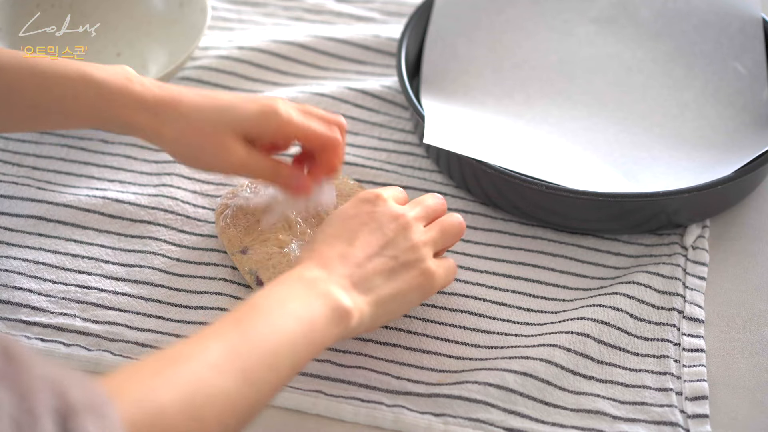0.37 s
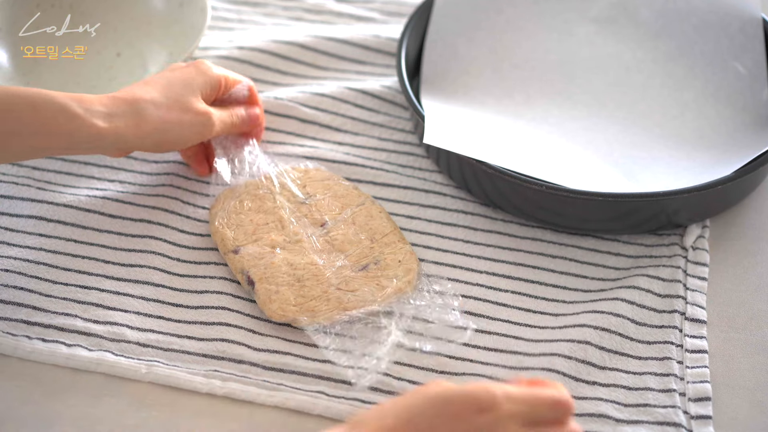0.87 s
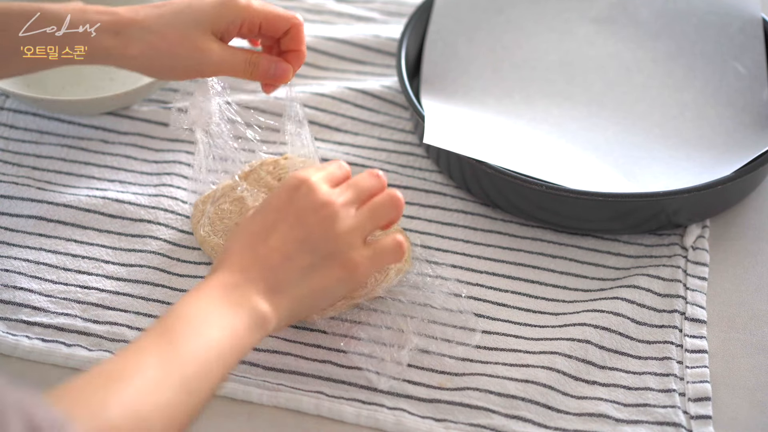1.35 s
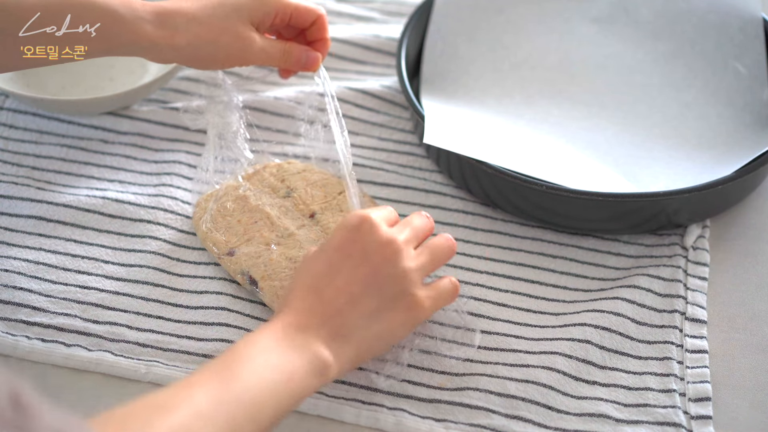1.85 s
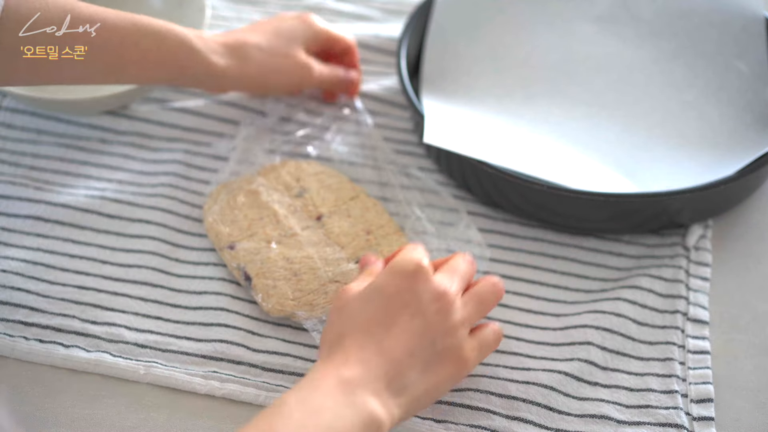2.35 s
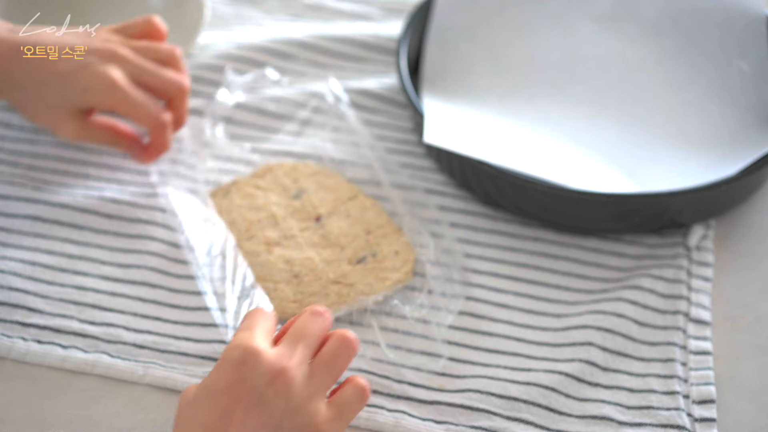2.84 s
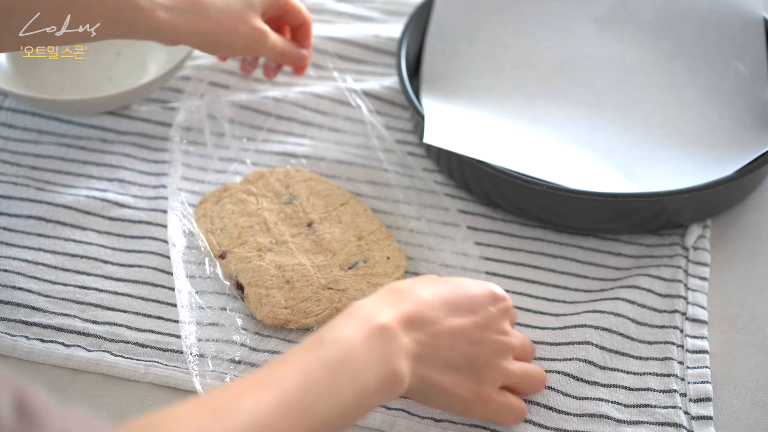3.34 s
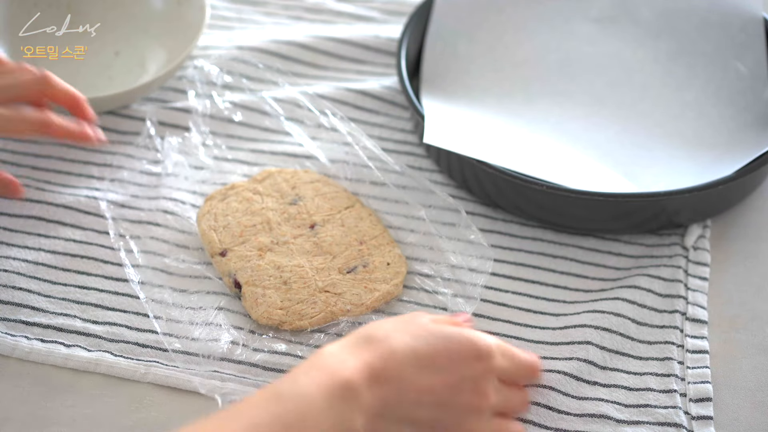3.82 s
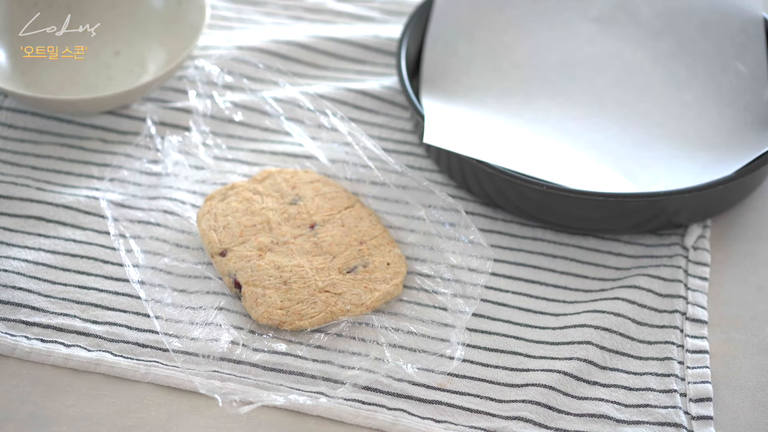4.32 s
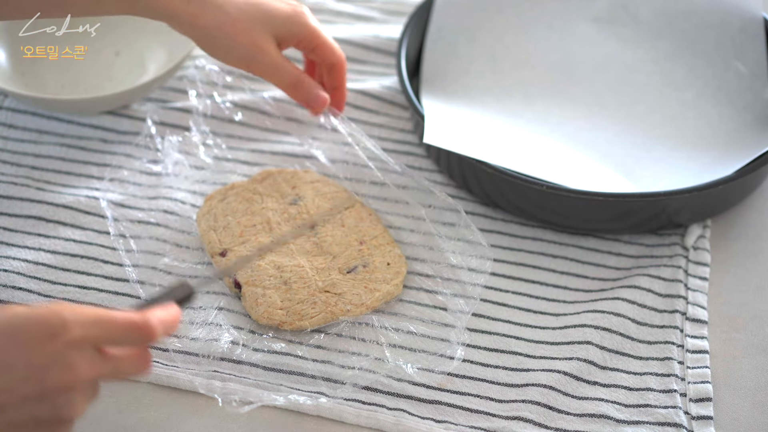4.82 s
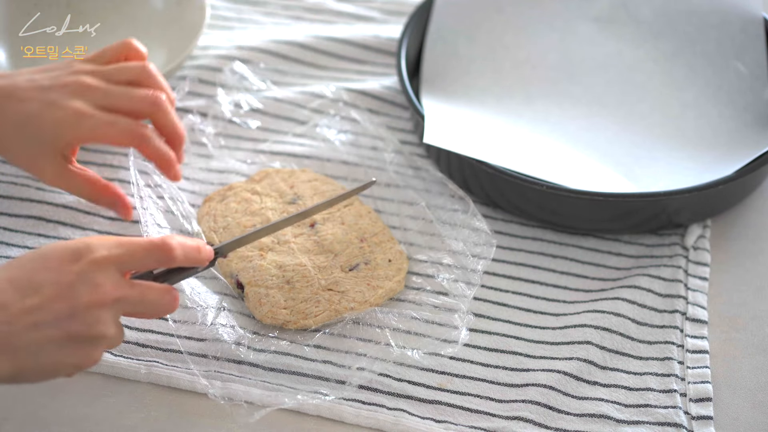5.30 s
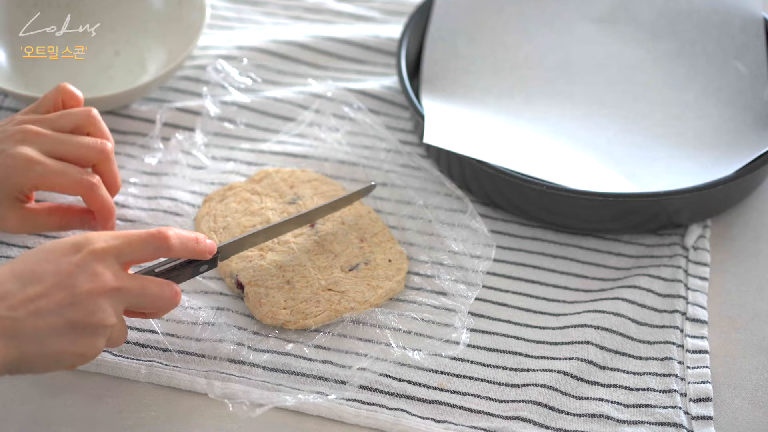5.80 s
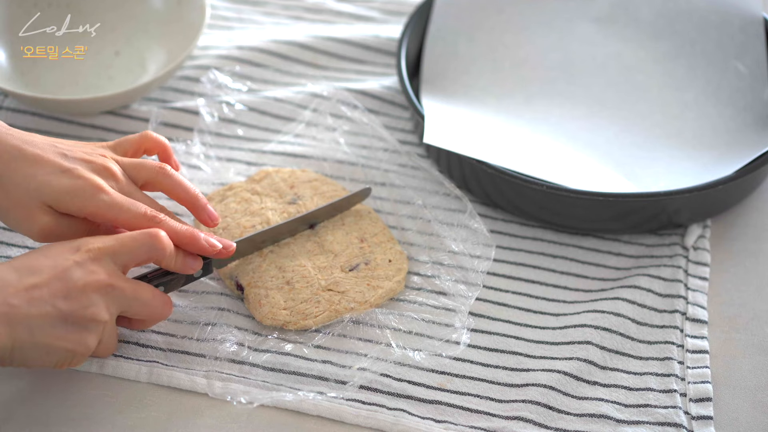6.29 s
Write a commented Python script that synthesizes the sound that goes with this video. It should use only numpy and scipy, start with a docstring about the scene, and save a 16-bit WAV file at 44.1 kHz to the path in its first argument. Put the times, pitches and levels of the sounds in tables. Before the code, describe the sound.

Thin plastic film crackles and snaps in bursts as hands peel it off dough, then a knife clinks and lighter crinkles follow in a quiet kitchen.

```python
"""Cling film crackles as hands peel it off a slab of dough: thousands of tiny random folds snap in bursts.
Creases snap at their own pitch, air pockets pop as noise pushes on resonances, and the towel rustles.
A bowl rings in pure tones and a knife clinks; a fridge hums over low rumble, air hiss and a faint whine.
It opens on the last moment of an oven fan, made of filtered noise; the fan fades out, then the kitchen fades in."""
import sys
import numpy as np
from scipy import signal
from scipy.fft import rfft, irfft
from scipy.io import wavfile
from scipy.ndimage import uniform_filter1d

SR = 44100
rng = np.random.default_rng(int(sys.argv[2]) if len(sys.argv) > 2 else 0)


def to_wav(s):
    """Save 16-bit WAV."""
    ch = np.atleast_2d(s).T  # columns
    pcm = np.round(np.clip(ch, -1, 1) * 32767)  # PCM
    wavfile.write(sys.argv[1], SR, pcm.astype(np.int16))


def to_linear_factor(level_db):
    """Convert decibel levels (scalar or array-like) to linear amplitude factors."""
    exponent = np.asarray(level_db, float) / 20
    return 10 ** exponent


N = 293706
T = np.arange(N) / SR  # time of each sample in seconds

# Kitchen levels below are set ahead of the room echo and of the final fade-in.
# Tone of the rumble. Each row: frequency in Hz, relative level in dB.
RUMBLE_TONE = [(15, -87.5), (25, -34.5), (124, -16), (198, -8.5), (237, -1), (372, -11), (509, -6),
               (823, -16.5), (900, -17.5), (1170, -48.5), (1980, -120)]
# Tone of the air hiss. Each row: frequency in Hz, relative level in dB.
AIR_TONE = [(240, -32), (400, -14.5), (740, -8.5), (775, -7), (890, -7.5), (976, -6.5), (1500, -7.5),
            (1950, -13), (2570, -19), (3000, -25.5), (9660, -40.5), (12000, -43.5), (15800, -48)]
# The fridge hum swells and sinks. Each row: time in seconds, level in dB.
HUM_LEVEL = [(.13, -47.5), (.5, -49.5), (1.0, -55), (1.3, -46.5), (1.82, -55.5), (2.69, -62.5), (3.6, -54),
             (4.37, -61.5), (4.9, -58.5), (5.7, -66.5), (6.66, -67)]
# Tone of the oven fan. Each row: frequency in Hz, relative level in dB.
OVEN_TONE = [(35, -56), (60, -35.5), (100, -3), (168, -22), (233, 5.5), (398, -8.5), (621, -2.5),
             (1310, -20), (1950, -3), (2410, -17.5), (2710, -15), (12400, -37), (16000, -53)]
# The last moment of the oven fan. Each row: time in seconds, level in dB.
OVEN_LEVEL = [(0, -49), (.01, -40), (.05, -48), (.075, -52.5), (.088, -62), (.092, -100)]
# The kitchen fades in and then holds its last gain. Each row: time in seconds, gain in dB.
KITCHEN_GAIN = [(.092, -48), (.1, -42), (.125, -12), (.16, -8), (.25, -3)]
# Tone of the rustling cloth. Each row: frequency in Hz, relative level in dB.
CLOTH_TONE = [(280, -1), (400, -4), (550, 0.5), (800, -4), (1000, -12)]
# Hands shift dough and towel. Each row: time of the height in seconds, level in dB, swell and fade in seconds.
TOWEL_PATS = [(.2, -60, 0.12), (.55, -48.5, 0.83), (.83, -59, 0.18), (.95, -62, 0.05), (1.2, -50.5, 0.62),
              (1.32, -48.5, .08), (1.43, -48.5, .06), (1.62, -50, 0.21), (1.97, -48, 0.16),
              (2.22, -51.5, 0.027), (2.42, -54, 0.37), (2.69, -47.5, .03), (2.92, -56.5, .1),
              (3.1, -60.5, 0.18)]
# Resonances of the bowl. Each row: frequency in Hz, width in Hz, level in dB.
BOWL_MODES = [(1615, 26, -72), (2729, 22, -59), (4080, 12, -50.5), (5660, 14, -67.5), (7472, 30, -89),
              (10196, 25, -74), (14023, 17.5, -70)]
# Resonances of the knife blade. Each row: frequency in Hz, width in Hz, gain in dB.
BLADE_MODES = [(3100, 44, 7.5), (3300, 150, 0), (4030, 69, 9.5), (4600, 110, -2), (5500, 200, -1),
               (5800, 150, -2), (7130, 150, 6.5), (7300, 49, 2), (7650, 150, -8), (8240, 95, 4),
               (8800, 90, -4), (9300, 120, -3), (10800, 120, -13), (11800, 110, 5), (12400, 140, -6),
               (14200, 130, 5), (15300, 120, -4), (15700, 90, -10)]
# Knocks on the blade. Each row: start in seconds, strength in dB, time to the fullest push in seconds.
BLADE_KNOCKS = [(4.305, -45, 0.0074), (4.328, -37, 0.0084), (4.336, -45, 0.003), (4.352, -39, 0.0072),
                (4.372, -49, .016)]
# Resonances of the knife handle. Each row: frequency in Hz, width in Hz, gain in dB.
HANDLE_MODES = [(690, 84, 0.5), (980, 140, -4), (1920, 120, 7.5), (2420, 390, -4.5), (2570, 210, 0),
                (3400, 490, -6), (4350, 760, -9.5), (6200, 710, -13), (8500, 710, -24), (9600, 470, -19),
                (12700, 1000, -34)]
# Knocks on the handle. Each row: start in seconds, strength in dB, time to the fullest push in seconds.
HANDLE_KNOCKS = [(4.574, -42, .003), (4.579, -31, .006), (4.6, -36, .007), (4.62, -42, .012)]
# Resonances of the air pockets. Each row: frequency in Hz, width in Hz, gain in dB.
POCKET_MODES = [(690, 130, -22), (2090, 200, 7), (2470, 320, 3.5)]
# Pops of the pockets. Each row: start in seconds, strength in dB, time to the fullest push in seconds.
POCKET_POPS = [(1.945, -36, .008), (2.817, -33, .005), (3.007, -38, .005)]
# The hollow under the sheet as it lifts off the dough. Each row: frequency in Hz, width in Hz, gain in dB.
HOLLOW_MODES = [(1120, 116, -3), (1282, 70, 6), (1570, 90, 1), (1700, 90, -2.5)]
# Pushes on that hollow. Each row: start in seconds, strength in dB, time to the fullest push in seconds.
HOLLOW_PUSHES = [(.82, -33.5, .009), (0.839, -33, .007)]
# Lone snaps of a crease. Each row: start in seconds, level in dB, pitch in Hz, left minus right in dB.
CREASE_SNAPS = [(0.2104, -61, 2330, 4), (0.2307, -55, 2140, 7), (0.3656, -47, 13700, -6),
                (0.6765, -45, 12100, 9), (0.7704, -39, 13600, 2), (0.7934, -32, 13380, 1.5),
                (0.8044, -27, 11800, -1.5), (0.8224, -28, 2890, -7.5), (0.8446, -24.5, 1740, 4),
                (0.961, -43, 13400, 6.5), (0.9895, -42, 13700, 4), (1.011, -52, 2410, 5),
                (1.0894, -34.5, 3100, 1), (1.125, -37, 14200, 0.5), (1.149, -33, 2280, -2),
                (1.1645, -32, 12800, -1), (1.2514, -26, 3850, 3.5), (1.3089, -32, 3880, 7),
                (1.463, -47, 12600, 6), (1.511, -41, 13900, -1.5), (1.5852, -27, 11400, -2.5),
                (1.5955, -28, 7810, 4), (1.6174, -30, 14200, -3.5), (1.6354, -30, 3960, 2.5),
                (1.852, -49, 7300, 3.5), (2.158, -30.5, 2730, -2), (2.225, -32, 12400, -1),
                (2.265, -32.5, 2680, -4), (2.3113, -31, 2930, 0.5), (2.4275, -42.5, 9800, -4),
                (2.4631, -45, 3300, 3), (2.496, -42.5, 3180, 3), (2.589, -33, 2820, -3),
                (2.7324, -33, 13300, 9), (2.8964, -38, 2480, 0), (3.246, -41, 12000, -1),
                (3.2908, -46, 12800, 1.5), (4.9588, -35, 3370, 3), (5.0642, -36, 3100, 1),
                (5.5455, -43.5, 2880, -5), (5.58, -35.5, 3270, 0), (5.783, -48.5, 3100, 9.5),
                (6.5108, -60, 13400, 1.5), (6.533, -53, 13600, 8), (6.578, -47, 3520, 4),
                (6.619, -54, 2000, 6)]
# Tones of the folds, from the smallest to the whole flexing sheet.
# Each row: frequency in Hz, relative level in dB.
FINEST_TONE = [(9000, -17.5), (11500, -8), (14000, -4.5), (15800, -8.5)]
FINE_TONE = [(4000, 1), (5500, -1.5), (7500, 0.5), (9500, 2), (11000, -9)]
PUCKER_TONE = [(2600, -16.5), (3150, -0.5), (3800, 0), (4300, -2), (4900, -19)]
WIDE_TONE = [(1700, -14.5), (2300, -1), (3000, 1.5), (4000, -1.5), (5000, -7)]
FLEX_TONE = [(600, -8), (1000, -10.5), (1280, -5.5), (1700, -2), (2300, -2), (3000, -15.5)]
# Each tug on the film. Each row: time of its height in seconds, strength in dB, swell in seconds,
# fade in seconds, breadth of the folds in dB.
FILM_TUGS = [(.17, -86, 0.058, .1, 17), (.25, -69.5, .04, 0.16, 1), (0.387, -41, 0.093, 0.17, -10.5),
             (.46, -43, 0.16, 0.21, -4), (.6, -49, 0.2, 0.091, -22), (.69, -48, 0.044, .06, -16),
             (0.776, -41, 0.15, 0.18, -11), (0.834, -37, 0.062, 0.043, 2), (.89, -48.5, 0.079, 0.11, -1.5),
             (.99, -66.5, 0.035, .04, -14), (1.046, -48, 0.033, 0.087, 2), (1.142, -47, 0.13, 0.22, -7),
             (1.195, -44, 0.048, 0.069, -0.5), (1.262, -47, 0.45, 0.18, -1), (1.376, -47, 0.2, 0.1, -4),
             (1.506, -36.5, 0.01, 0.076, -31), (1.632, -37, 0.14, 0.11, -7.5),
             (1.71, -51.5, 0.044, 0.037, -2), (1.872, -59.5, 0.048, 0.12, -4.5), (1.92, -68, .03, .03, -10),
             (1.961, -41, 0.031, 0.16, -3), (2.13, -54, 0.045, 0.044, -10), (2.06, -46, 0.074, 0.084, -4),
             (2.214, -43, 0.16, 0.19, 1), (2.36, -53, 0.15, 0.075, -1.5), (2.428, -62, 0.023, 0.018, -3),
             (2.465, -66, 0.055, 0.041, 10), (2.496, -60, 0.022, 0.043, 5.5), (2.567, -51, 0.021, 0.077, 1),
             (2.6, -46.5, 0.067, 0.11, 2.5), (2.69, -45, 0.099, 0.065, -13),
             (2.746, -42.5, 0.033, 0.069, -6.5), (2.89, -42.5, 0.089, 0.072, -4.5),
             (2.94, -44, 0.071, 0.058, 4), (3.014, -43, 0.077, 0.07, -6.5),
             (3.245, -50.5, 0.0078, 0.23, -20), (3.341, -43, 0.074, 0.15, -2), (3.414, -44, 0.17, 0.19, 0),
             (3.52, -50.5, 0.15, .05, -1), (3.564, -68, .03, 0.034, 0), (3.698, -68, .01, .03, -12),
             (3.74, -46.5, 0.024, 0.17, -1), (3.806, -42.5, 0.1, 0.063, 0), (3.885, -71, .015, 0.012, -8),
             (3.998, -70, 0.046, .025, -3), (4.19, -72.5, 0.2, 0.057, 4.5), (4.91, -65, 0.013, .06, -25),
             (4.97, -49, 0.048, 0.12, -2.5), (5.05, -51.5, 0.097, 0.1, -1.5),
             (5.114, -57, 0.083, 0.038, -2), (5.411, -63.5, 0.01, 0.095, -21),
             (5.477, -52.5, 0.058, 0.09, -1.5), (5.574, -53, 0.11, 0.082, 1), (5.745, -70, .012, 0.026, 8),
             (5.779, -60.5, .012, 0.13, 1), (5.84, -67, .02, 0.039, -4), (5.91, -60.5, .03, .04, -5),
             (5.942, -59.5, 0.028, 0.048, -1), (6.29, -81, .02, 0.026, -10), (6.42, -64.5, 0.058, 0.26, -6),
             (6.49, -70, .05, .05, -4), (6.542, -58, 0.018, 0.049, -13), (6.588, -60, .04, 0.029, -1),
             (6.64, -65.5, 0.048, .06, -2)]
# How each kind of fold follows a tug, in the order finest, fine, wide, flex, ticks, pucker.
# Each row: level above the tug in dB, share of the breadth added, steepness of swell and fade,
# extra dB per dB of strength above a firm tug.
FOLD_RULES = [(0.0, 0.036, 1.3, 0.0), (-1.5, 0.22, 1.18, 0.19), (-2.0, 1, 1.36, 0.18),
              (-11.5, 0.5, 0.8, 0.21), (-7, 0, 1.04, -0.04), (-8.5, 1, .8, 0.1)]
# The whole sheet bends. Each row: time of the height in seconds, level in dB, swell and fade in seconds.
SHEET_BENDS = [(.45, -57, 0.079, 0.22), (.845, -42, 0.074, 0.054), (1.046, -54.5, 0.055, 0.07),
               (1.145, -61, 0.02, .1), (1.96, -41.5, 0.014, 0.054), (1.63, -49.5, 0.054, 0.057),
               (2.2, -61, 0.072, 0.093), (2.934, -53, .05, 0.03), (3.016, -57, 0.018, 0.046)]
# The working hand. Each row: time in seconds, left minus right in dB before a small fixed shift,
# dB added to the finest crackle as it faces the microphone.
HAND_PLACE = [(0.3, 2.5, 0.7), (1.37, 0.5, 1.5), (1.51, 4.5, -8), (1.54, 1.0, -2.7), (2.32, 1.5, 1.94),
              (2.44, -1, -2), (2.51, 1.5, 2), (2.95, 2, 3.5), (3.0, 5.5, -1), (3.21, 1, 2.5),
              (4.13, 1.5, -3.2), (4.41, 1, 1.5), (5.37, 2, -2), (5.41, 6, 3.5), (5.67, 3, -4),
              (5.97, 6.5, -4), (6.0, 3, -3), (6.6, 3.5, -3)]

RUMBLE_START_DB, RUMBLE_END_DB, RUMBLE_SETTLE_S = -45, -57.5, 1
AIR_DB = -58
HUM_HZ, DEEP_HZ = 240.2, 122
DEEP_DB, DEEP_SWELL = -83, (5.5, -70.5, 0.7, 1)  # resting level; one swell as swells() takes it
WHINE_HZ, WHINE_DB = 1472, -68
BOWL_S, BOWL_RISE_S = 3.196, 0.0036
FIRM_DB = -45  # strength of a firm tug
EDGE_DB, EDGE_POWER = 21, 1.75  # drop after one swell or fade time, times steepness; roundness of the top
DULL_HZ, DULL_SHARE = 6000., 0.48  # well above this the room rings for only this share of the time
TOP_HZ = 15850


def unit(x):
    """Scale a sound to an average (rms) strength of 1."""
    return x / np.sqrt(np.mean(x ** 2))


def curve(rows, col=1):
    """Draw straight lines through one column of a table, sample by sample."""
    rows = np.array(rows)
    return np.interp(T, rows[:, 0], rows[:, col])


def colour(x, points):
    """Filter to a tone curve without ringing ahead of a click (minimum phase, from the cepstrum)."""
    hz, db = np.transpose(points)
    log_hz = np.log(np.fft.rfftfreq(4096, 1 / SR) + 1)
    # the curve falls steeply beyond both ends
    all_hz = np.r_[hz[0] / 4, hz, hz[-1] * 4]
    all_db = np.r_[db[0] - 40, db, db[-1] - 60]
    gain_db = np.interp(log_hz, np.log(all_hz), all_db)
    # fold the later half of the cepstrum onto the first
    cepstrum = irfft(np.log(to_linear_factor(gain_db)))
    cepstrum[1:2048] *= 2
    cepstrum[2049:] = 0
    response = irfft(np.exp(rfft(cepstrum)))
    return signal.fftconvolve(x, response[None], axes=1)[:, :N]


def walk(rate):
    """Wander at random: new values, rate times a second, joined by short slides; spread near 1."""
    hold = int(SR / rate)
    steps = np.repeat(rng.standard_normal(N // hold + 1), hold)
    return uniform_filter1d(steps, hold // 2)[:N]


def swells(rows, steep=0.79):
    """Gain of overlapping events (height s, dB, swell s, fade s), whose powers add."""
    t = T[::44]  # a coarse clock is enough for slow changes
    power = 1e-14
    for s, db, swell, fade in rows:
        age = np.where(t < s, (s - t) / swell, (t - s) / fade)
        power = power + to_linear_factor(2 * (db - steep * EDGE_DB * age ** EDGE_POWER))
    return np.interp(T, t, np.sqrt(power))


def wide_noise(share, side_hz=20.):
    """Noise shared by left and right, plus a share of opposite noise above side_hz for width."""
    mid, side = rng.standard_normal((2, N))
    side = signal.lfilter([1, -1], [1, -np.exp(-2 * np.pi * side_hz / SR)], side)
    return np.array([mid + share * side, mid - share * side])


def pan(db):
    """Left and right gains for a left minus right difference in dB."""
    return to_linear_factor(np.array([db, -db]) / 2)


def kitchen(x, t60, wet_db):
    """Towel, tin and walls send back a short noisy tail, another to each side; its treble dies first."""
    t = np.arange(SR // 3) / SR
    noise = rng.standard_normal((2, len(t)))
    keep = np.exp(-2 * np.pi * DULL_HZ / SR)
    low = signal.lfilter([1 - keep], [1, -keep], noise)
    high = noise - low
    fall = np.exp(-np.log(1000) * t / t60)  # 60 dB down after t60 seconds
    tail = (low * fall + high * fall ** (1 / DULL_SHARE)) * (t > .0006)
    tail /= np.sqrt(np.sum(tail ** 2, axis=1, keepdims=True))
    return x + to_linear_factor(wet_db) * signal.fftconvolve(x, tail, axes=1)[:, :N]


def crackle(per_s, spread_db, clump_db, spread):
    """Folds let go at random: many weak, a few strong, in louder clumps, each from its own spot."""
    fires = rng.random(N) < per_s / SR
    size_db = spread_db * np.minimum(rng.exponential(size=N), 5)
    clicks = fires * rng.choice([-1, 1], N) * to_linear_factor(size_db + clump_db * walk(45))
    angle = np.pi / 4 + spread * rng.uniform(-1.22, 1, N)
    return clicks * np.array([np.cos(angle), np.sin(angle)])


def background():
    """Rumble that settles and air hiss are filtered noise; hum and whine are wavering sine waves."""
    rumble_db = RUMBLE_END_DB + (RUMBLE_START_DB - RUMBLE_END_DB) * np.exp(-T / RUMBLE_SETTLE_S)
    rumble = unit(colour(wide_noise(0.083), RUMBLE_TONE)) * to_linear_factor(rumble_db + walk(9.6))
    air = unit(colour(wide_noise(0.67, side_hz=356.0), AIR_TONE)) * to_linear_factor(AIR_DB)
    hum = np.sin(2 * np.pi * HUM_HZ * T + 0.73 * walk(12))
    hum *= to_linear_factor(curve(HUM_LEVEL) + 2.48 * walk(14))
    deep_gain = (to_linear_factor(DEEP_DB) + swells([DEEP_SWELL])) * to_linear_factor(1.47 * walk(4.9))
    deep = np.sin(2 * np.pi * DEEP_HZ * T) * deep_gain
    whine = np.sin(2 * np.pi * WHINE_HZ * T + 1.6 * walk(13)) * to_linear_factor(WHINE_DB + 2.0 * walk(4.2))
    return rumble * pan(1.0)[:, None] + air * pan(3.2)[:, None] + hum + deep + whine


def oven_fan():
    """Blown air is noise with a tone curve, which fades to silence."""
    return unit(colour(wide_noise(0.6, side_hz=350.), OVEN_TONE)) * to_linear_factor(curve(OVEN_LEVEL))


def pats():
    """Soft contacts of the towel: dull, clumped clicks make a lumpy rustle."""
    rustle = unit(colour(crackle(1500, 0.63, 5.5, 0.4), CLOTH_TONE))
    return rustle * swells([(s, db, spell, spell) for s, db, spell in TOWEL_PATS])


def bowl():
    """A soft touch swells the bowl's pure tones, which then die away cleanly, wide ones faster."""
    age = np.maximum(T - BOWL_S, 0)
    rings = 0
    for hz, width, db in BOWL_MODES:
        rings = rings + to_linear_factor(db) * np.sin(2 * np.pi * hz * age) * np.exp(-np.pi * width * age)
    return rings * (1 - np.exp(-age / BOWL_RISE_S)) * pan(2.5)[:, None]


def clink(modes, blows, pan_db, scrape_db, tick_db, bounce_db=10.5):
    """A rough contact ticks, then pushes for some ms: noise feeds resonances and its scrape is heard."""
    push, tick = np.zeros((2, N))
    for s, db, contact in blows:
        age = np.maximum(T - s, 0)
        push += to_linear_factor(db) * age / contact * np.exp(1 - age / contact)
        later = s > blows[0][0]  # bounces after the first blow tick more softly
        tick += to_linear_factor(db - bounce_db * later) * (T > s) * np.exp(-age / 0.0037)
    hiss = np.diff(wide_noise(0.77), prepend=0)
    out = (to_linear_factor(scrape_db) * push + to_linear_factor(tick_db) * tick) * hiss
    for hz, width, db in modes:
        pole = np.exp(-np.pi * width / SR)
        ring = [1, -2 * pole * np.cos(2 * np.pi * hz / SR), pole ** 2]
        out += to_linear_factor(db) * (1 - pole) * signal.lfilter([1, 0, -1], ring, push * wide_noise(0.86))
    return out * pan(pan_db)[:, None]


def snaps():
    """A crease flips: a few cycles at its own pitch, with a splash of hiss, larger for high pitches."""
    length = 1024
    out, t = np.zeros((2, N + length)), np.arange(length) / SR
    noise = rng.standard_normal((len(CREASE_SNAPS), length))
    for (s, db, hz, pan_db), splash in zip(CREASE_SNAPS, noise):
        age = t * hz / 1.2  # fullest after 1.2 cycles
        pop = np.sin(2 * np.pi * hz * t) * age * np.exp(1 - age)
        pop += (0.72 + hz / 30000) * np.diff(splash, prepend=0) * np.exp(-t / 0.0014)
        i = int(s * SR)
        out[:, i:i + length] += to_linear_factor(db) * pan(pan_db)[:, None] * pop
    return out[:, :N]


def fold_layer(clicks, tone, t60, wet_db):
    """Folds of one size: their clicks take on a tone and a short echo."""
    return kitchen(unit(colour(clicks, tone)), t60, wet_db)


def film():
    """Folds of five sizes share some snaps; broad ones speak lower, and tugs swell them all."""
    shared = unit(crackle(1500, 1.1, 5.9, 1.0)) + 0.65 * unit(crackle(220, 2.4, 3.1, 0.45))
    finest = fold_layer(0.42 * shared + unit(crackle(6910, 3.2, 3.6, 0.2)), FINEST_TONE, .1, -2.5)
    fine = fold_layer(0.84 * shared + unit(crackle(5000, 2.34, 2.36, 1.0)), FINE_TONE, 0.019, 0)
    wide = fold_layer(0.68 * shared + unit(crackle(4000, 4.3, 4.4, 0.34)), WIDE_TONE, 0.23, -2.8)
    flex = fold_layer(0.34 * shared + unit(crackle(3000, 2.8, 2.7, 0.2)), FLEX_TONE, 0.033, -3.5)
    pucker = fold_layer(0.4 * shared + unit(crackle(2000, 3.0, 3.0, 0.71)), PUCKER_TONE, .08, -6.0)
    # the nearest folds arrive as ticks without an echo of their own layer
    ticks = unit(colour(crackle(97, 2.1, 1.5, .4), FINEST_TONE))
    ticks = ticks + to_linear_factor(-5.5) * unit(colour(crackle(90, 2.3, 1.5, .5), FINE_TONE))
    finest = finest * to_linear_factor(curve(HAND_PLACE, col=2))
    out = flex * swells(SHEET_BENDS)
    layers = (finest, fine, wide, flex, ticks, pucker)
    for folds, (above_db, share, steep, extra) in zip(layers, FOLD_RULES):
        rows = []
        for s, db, swell, fade, breadth in FILM_TUGS:
            level_db = db + above_db + share * breadth + extra * (db - FIRM_DB)
            rows.append((s, level_db, swell, fade))
        out = out + folds * swells(rows, steep)
    return out * pan(curve(HAND_PLACE) - 1.1)


def scene():
    """The oven fan fades to silence, then the kitchen fades in."""
    pockets = clink(POCKET_MODES, POCKET_POPS, 1.15, -40, -33)
    hollow = clink(HOLLOW_MODES, HOLLOW_PUSHES, 0.5, -45, -40)
    blade = clink(BLADE_MODES, BLADE_KNOCKS, 0.97, -21, -13)
    handle = clink(HANDLE_MODES, HANDLE_KNOCKS, 0.9, -46, -8)
    hard = snaps() + pockets + hollow + bowl() + blade + handle
    table = pats() + kitchen(film(), 0.22, -20.5) + kitchen(hard, 0.053, -2)
    return oven_fan() + (table + background()) * to_linear_factor(curve(KITCHEN_GAIN))


def top_cut(x):
    """Nothing passes above the cut-off."""
    return signal.sosfilt(signal.butter(12, 16490, fs=SR, output="sos"), x)


def record(dry):
    """The camera cuts the top of the treble with a steep low-pass filter."""
    low_pass = signal.ellip(10, .2, 70, TOP_HZ, fs=SR, output="sos")
    finished = signal.sosfilt(low_pass, dry)
    return top_cut(finished)


dry = scene()
out = record(dry)
to_wav(out)
```